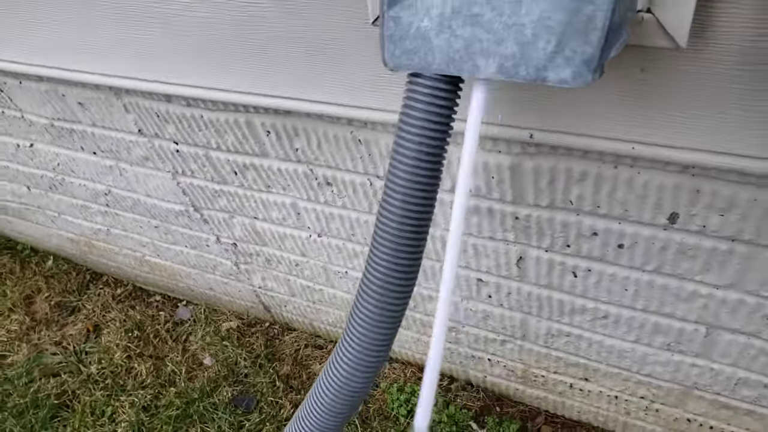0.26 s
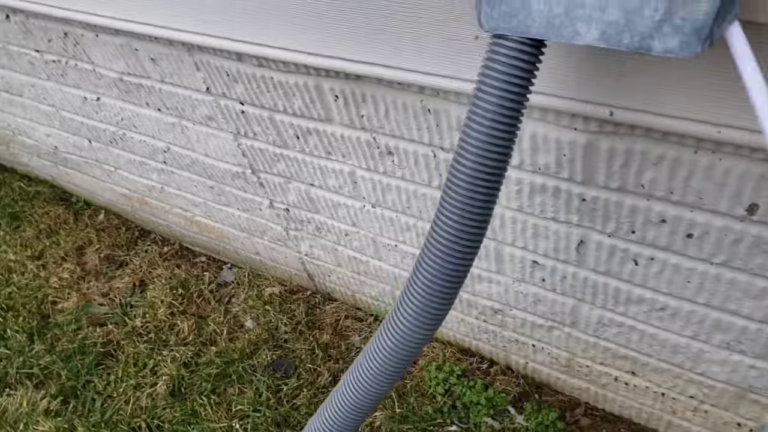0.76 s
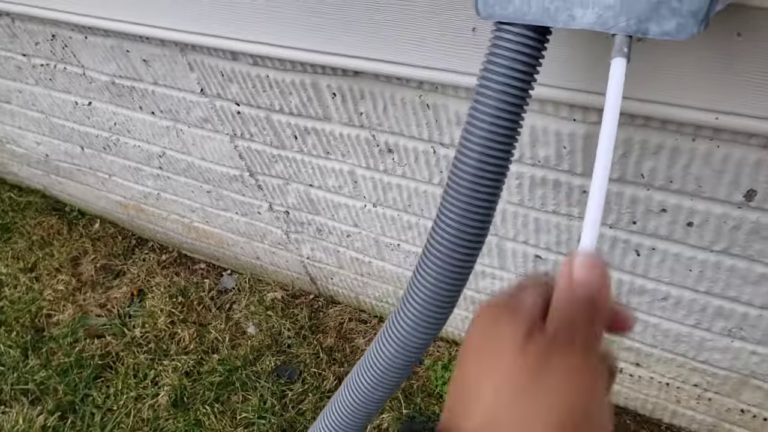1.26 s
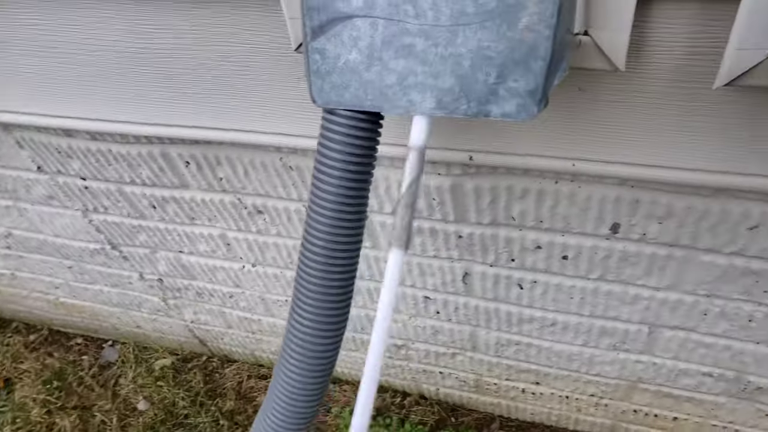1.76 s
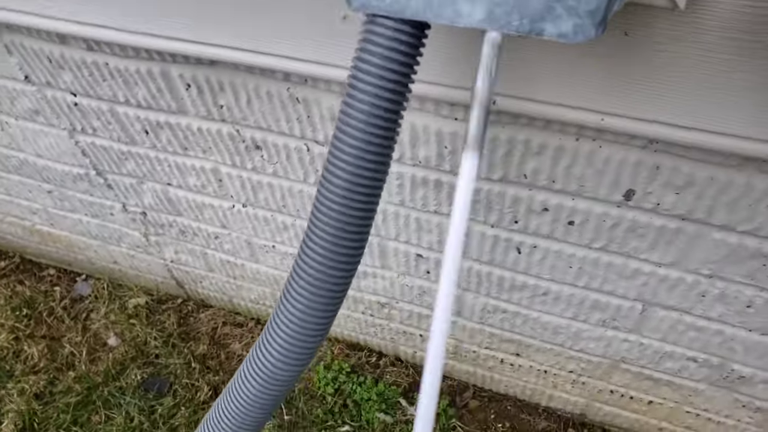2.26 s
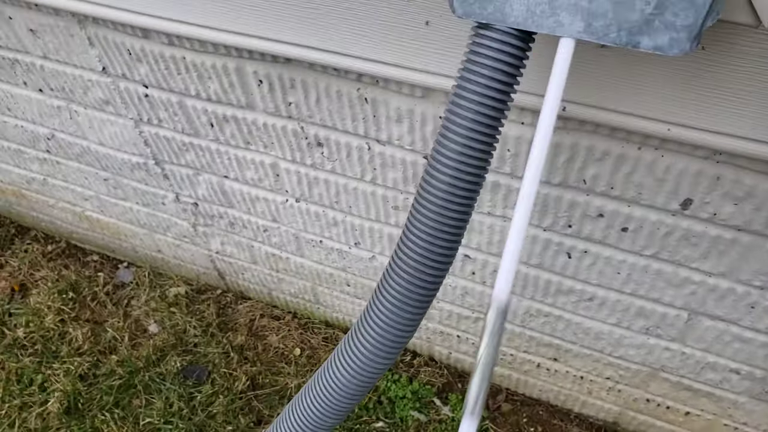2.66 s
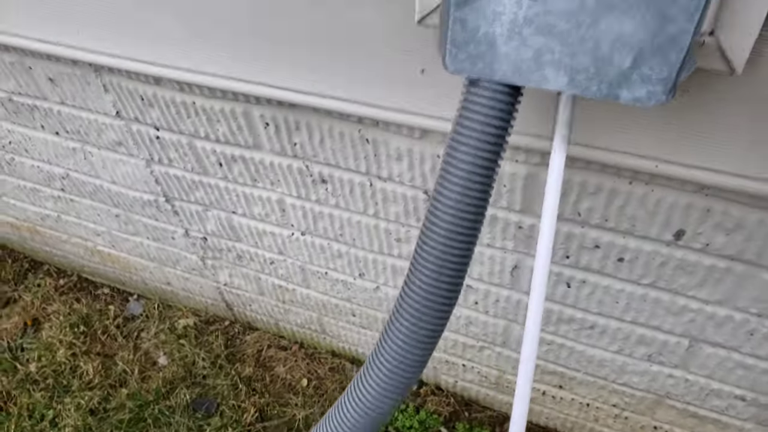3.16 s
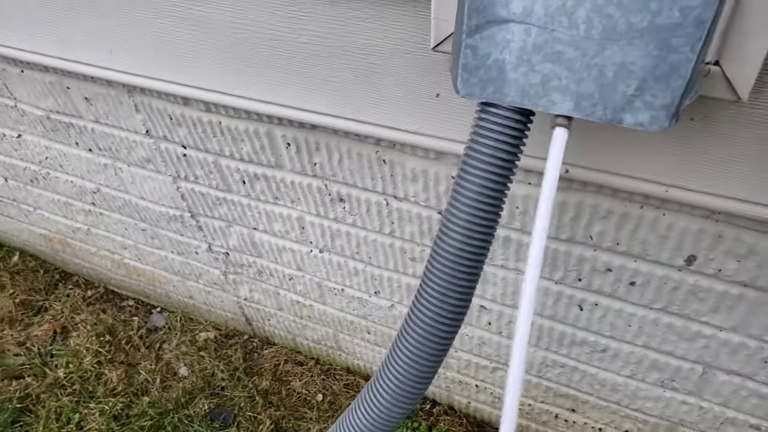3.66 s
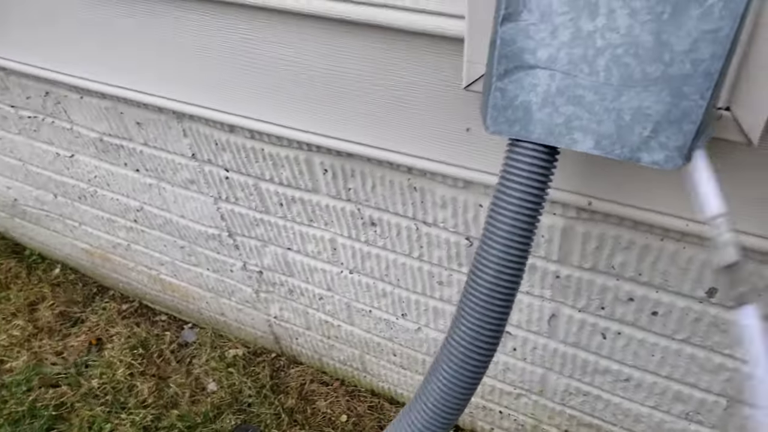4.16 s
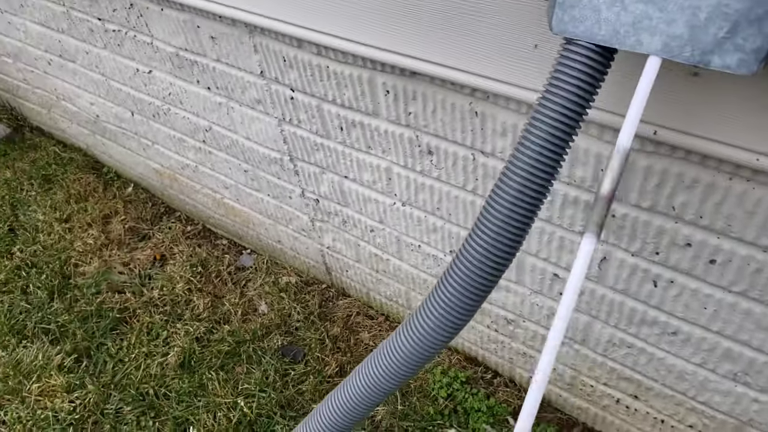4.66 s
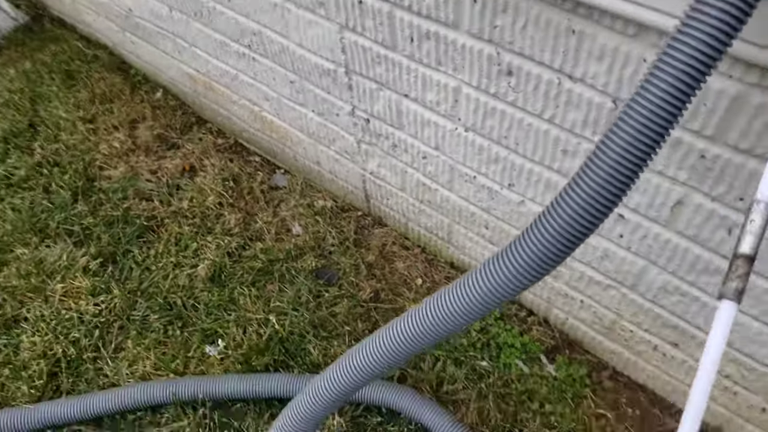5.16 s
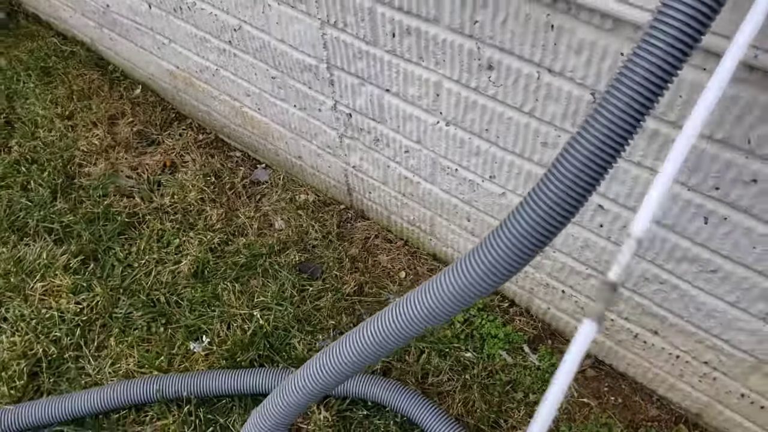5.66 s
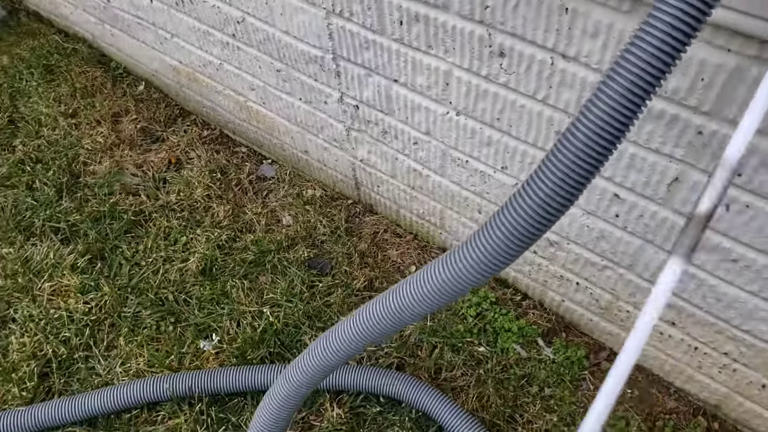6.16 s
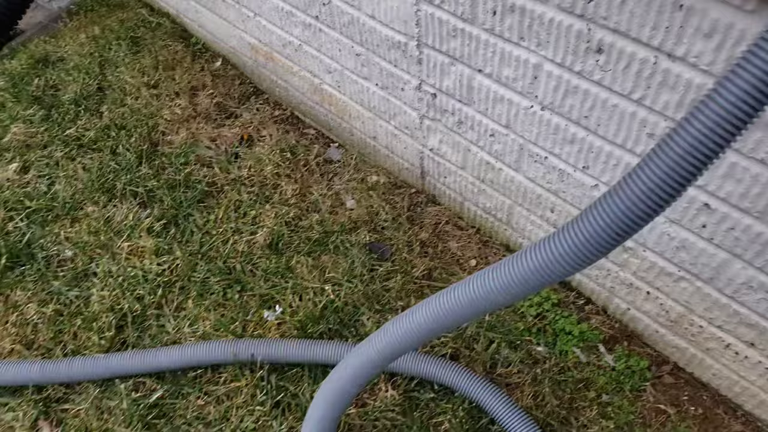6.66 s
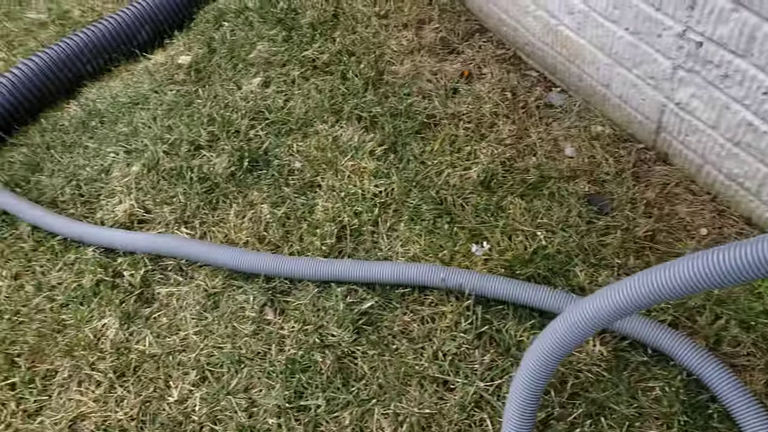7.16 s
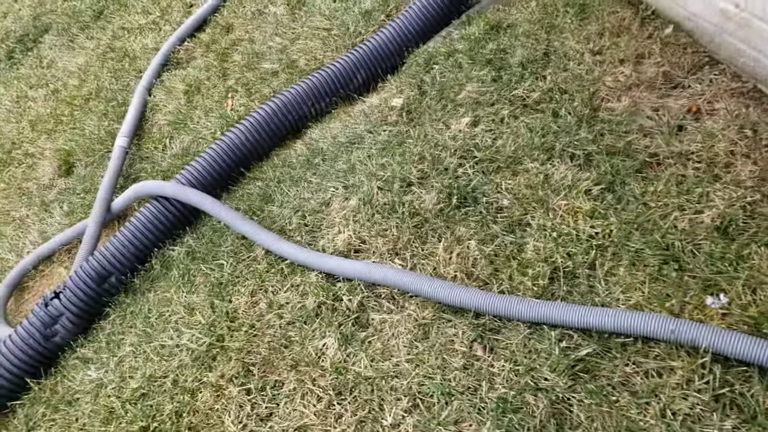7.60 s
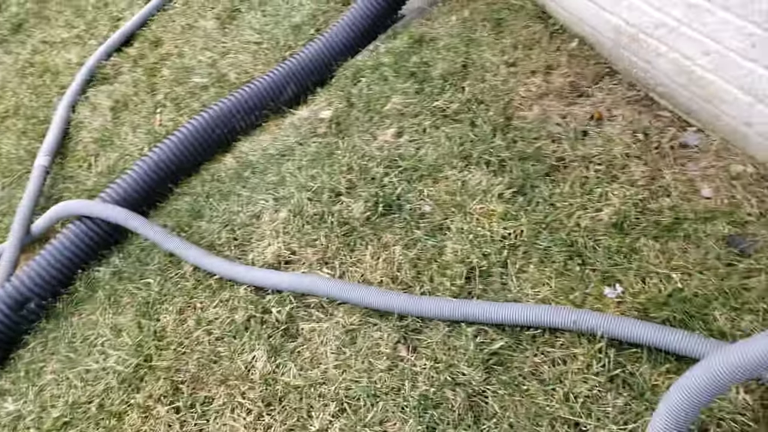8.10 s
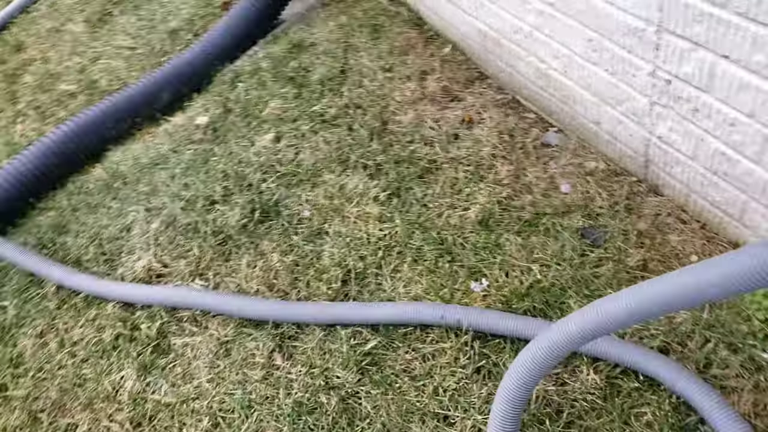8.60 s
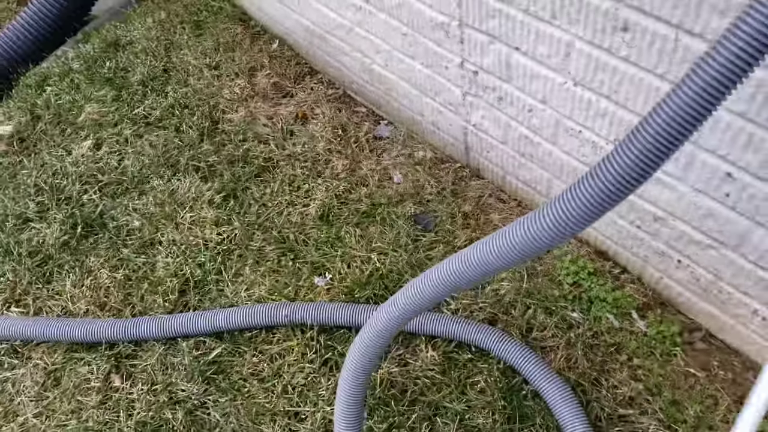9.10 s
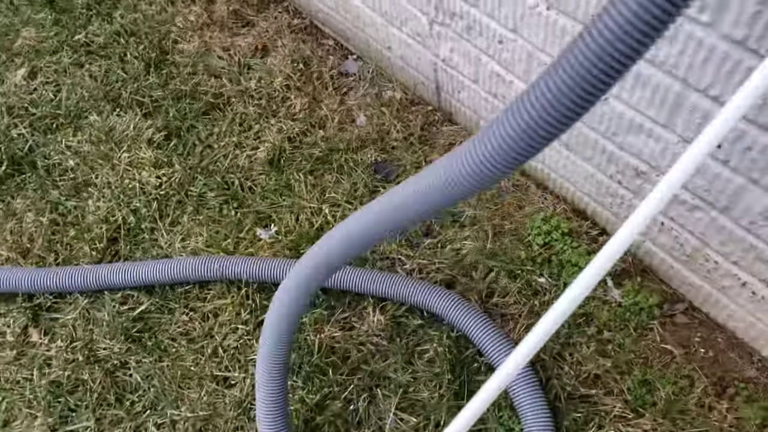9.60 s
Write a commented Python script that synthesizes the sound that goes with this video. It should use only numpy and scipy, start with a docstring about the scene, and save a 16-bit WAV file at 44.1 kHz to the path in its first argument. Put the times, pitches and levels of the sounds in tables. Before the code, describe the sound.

Irregular hollow metal bangs, plastic clacks and coupling clinks rattle over a distant engine drone, stop for about a second, then resume.

```python
"""A flexible cleaning rod knocks on a sheet-metal vacuum hood on a house wall, and rests for a moment. Each
knock is a burst of noise that rings the dryer duct, the hood, the rod and its metal couplings. Inside the duct
the rod's brush tumbles and scrapes: random small contacts shaped by a spectrum. Couplings clink on the rim, and
slips of the rod and its couplings rub and squeak through narrow, gliding resonances. The vacuum hums across the
lawn (sines in noise) and air hisses, while the listener turns away and back."""
import sys
import numpy as np
from scipy import signal
from scipy.fft import rfft, irfft, next_fast_len
from scipy.io import wavfile
from scipy.ndimage import uniform_filter1d, map_coordinates

SR = 44100
rng = np.random.default_rng(int(sys.argv[2]) if len(sys.argv) > 2 else 0)


def wav_out(sig):
    """Save sig, one row per channel (or a flat mono array), as 16-bit PCM at SR to the path in sys.argv[1]."""
    wavfile.write(sys.argv[1], SR, np.round(np.clip(np.atleast_2d(sig).T, -1, 1) * 32767).astype(np.int16))


N = 433944


def gain_of(db):
    """Turns decibels into an amplitude factor."""
    return 10 ** (np.asarray(db) / 20)


def evened(x):
    """Scales a signal to unit rms."""
    return x / np.sqrt(np.mean(x ** 2) + 1e-20)


def steadied(x, seconds):
    """Holds the power even over this stretch of time, leaving the quicker bumps."""
    power = uniform_filter1d(np.mean(x ** 2, 0), size=int(seconds * SR))
    return x / np.sqrt(np.maximum(power, 0) + power.mean() / 20)


def read(points, hz):
    """Reads a spectrum whose points are joined by straight lines over log frequency."""
    f, value = np.transpose(points)
    return np.interp(np.log(hz + 1), np.log(f + 1), value)


def curve(rows, order=1):
    """Reads one column of a time table at every sample."""
    rows = np.asarray(rows)
    return np.interp(np.arange(N) / SR, rows[:, 0], rows[:, order])


def add(mix, s, sound):
    """Mixes a stereo sound in at s seconds."""
    part = mix[:, max(round(s * SR), 0):][:, :sound.shape[1]]
    part += sound[:, :part.shape[1]]


def drift(rate_hz):
    """Wanders slowly at random, with unit rms: noise with its quick changes removed."""
    hz = np.fft.rfftfreq(N // 64, 64 / SR)
    spectrum = rfft(rng.standard_normal(N // 64)) / (1 + (hz / rate_hz) ** 4)
    slow = evened(irfft(spectrum))
    return np.interp(np.arange(N) / 64, np.arange(len(slow)), slow)


# How alike the two ears hear. Each row: frequency in Hz, likeness from 0 to 1.
SAME = [(100, 0.99), (350, 0.99), (600, 0.82), (800, 1), (1200, 0.41), (2200, 0.22), (4000, 0.15),
        (15000, 0)]


def radiate(force, spectrum, ripple=0):
    """Two force tracks ring a body and reach the ears, alike in the bass and unlike in the treble."""
    length = force.shape[-1]
    size = 2 * next_fast_len((length + 1) // 2)
    bins = size // 2 + 1
    hz = abs(np.fft.fftfreq(size, 1 / SR))
    # this phase makes the body ring only after the force arrives
    log_gain = np.log(gain_of(read(spectrum, hz) + ripple))
    body = np.exp(np.conj(signal.hilbert(log_gain)))[..., :bins]
    same = np.clip(read(SAME, hz[:bins]), 0, 1)
    mid, side = rfft(force, size) * body
    mid, side = mid * np.sqrt(1 + same), side * np.sqrt(1 - same)
    return irfft(np.array([mid + side, mid - side]), size)[..., :length]


def grains(per_s, spread_db):
    """Draws random contacts, mostly small and a few large."""
    size = gain_of(spread_db * np.minimum(rng.exponential(1, N), 4))
    happens = rng.random(N) < per_s / SR
    return evened(rng.standard_normal((2, N)) * size * happens)


SPOT_DB, SPOT_WIDTH_HZ = 5.8, 85  # resonances of a spot: depth, and width near 1 kHz


def spot(count, size, depth_db):
    """Each place that is hit favours its own resonances: a random ripple over frequency, in dB."""
    hz = abs(np.fft.fftfreq(size, 1 / SR))
    place = np.sqrt(hz * 1000) / SPOT_WIDTH_HZ
    heights = np.clip(rng.standard_normal((count, 256)), -1.7, 1.7)
    step = place.astype(int)
    blend = np.sin(np.pi / 2 * (place % 1)) ** 2
    return depth_db * (heights[:, step] * (1 - blend) + heights[:, step + 1] * blend)


BOUNCES_PER_S = 220  # how often a dragging rod bounces


def bounces(count, size):
    """Makes the uneven run of ticks, fading in about a millisecond each, with which the rod chatters."""
    at = np.cumsum(rng.uniform(.3, 1.7, (count, 64)), axis=1) * SR / BOUNCES_PER_S
    hits = np.zeros((count, size))
    np.put_along_axis(hits, np.minimum(at.astype(int), size - 1), rng.uniform(0.74, 1, at.shape), 1)
    return evened(signal.lfilter([1], [1, -np.exp(-1000 / SR)], hits))


# Tones of the engine. Each row: pitch in Hz, level in dB around which the tone wavers.
HUM = [(105.6, -41), (126.6, -46.5), (193.6, -49)]
# Colour of the drone under the tones. Each row: frequency in Hz, relative strength in dB per Hz.
DRONE = [(20, -6), (40, -8.5), (62, 2), (90, -3.5), (140, -5.5), (165, -26.5), (290, -8), (420, -18),
         (520, -13.5), (630, -55), (820, -21), (1000, -18), (1400, -20.5), (1750, -26.5), (2000, -17.5),
         (2300, -28), (3200, -31), (6000, -27)]


def vacuum():
    """The distant engine turns steadily: tones of wavering strength and phase in a low noisy drone."""
    t = np.arange(N) / SR
    tones = 0
    for hz, db in HUM:
        strength = gain_of(db + .8 * drift(rate_hz=3.9))
        tones = tones + strength * np.sin(2 * np.pi * hz * t + 0.24 * drift(rate_hz=7.4))
    drone_level = gain_of(-38.0 + drift(rate_hz=4.5))
    drone = drone_level * evened(radiate(rng.standard_normal((2, N)), DRONE))
    return np.sqrt(2) * tones + drone


# Rise and fall of the leaking air. Each row: time in seconds, relative level in dB.
AIR = [(0, -41), (1.4, -42), (2.6, -37.5), (5, -38.5), (6.4, -34), (7.5, -38.5), (8.6, -34.5), (9.3, -36.5),
       (9.84, -29.5)]
# Colour of the leaking air. Each row: frequency in Hz, relative strength in dB per Hz.
HISS = [(2500, -65), (5500, -3), (6700, -6.5), (7800, 1), (9500, -3.5), (11200, -0.5), (12700, 5),
        (15400, 7)]


def air(echo_ms=0.444, sway=0.08):
    """Leaking air is a fine hiss; its top reflects off the wall and ripples as the listener moves."""
    hiss = radiate(rng.standard_normal((2, N)), HISS)
    top = signal.sosfilt(signal.butter(4, 11000, "high", fs=SR, output="sos"), hiss)
    # the listener's swaying stretches and shortens the echo delay
    sways = drift(rate_hz=.4) + .15 * drift(rate_hz=3)
    late = np.arange(N) - SR * echo_ms / 1000 * (1 + sway * sways)
    echo = np.array([map_coordinates(ear, [late], order=3) for ear in top])
    heard = hiss + .28 * echo
    return evened(heard) * gain_of(curve(AIR) + 2.5) * gain_of([[.6], [-.6]])  # a little more at left


SETTLE_S = 0.031  # time the brush takes to settle after a knock


def jolts():
    """Shaking of the brush at every sample: it jumps with each knock and settles."""
    kicks = np.zeros(N)
    for s, force_db, *_ in KNOCKS:
        kicks[round(s * SR)] = gain_of(force_db) ** 2
    return np.sqrt(signal.lfilter([1], [1, -np.exp(-2 / (SETTLE_S * SR))], kicks))


# light taps between the knocks: how often, and how fast each rises and dies
TAPS_PER_S, TAP_RISE_S, TAP_RING_S = 85, .001, .008


def rattle():
    """The plastic rod taps lightly at random moments: short scuffs, each coloured by its own spot."""
    count = round(TAPS_PER_S * N / SR)
    t = np.arange(2048) / SR
    swell_and_fade = np.exp(-t / TAP_RING_S) * (1 - np.exp(-t / TAP_RISE_S))
    scuffs = rng.standard_normal((2, count, len(t))) * swell_and_fade
    taps = radiate(scuffs, ROD, spot(count, len(t), SPOT_DB))
    out = np.zeros((2, N))
    for k, (when, size) in enumerate(rng.random((count, 2))):
        add(out, when * N / SR, size ** 2 * evened(taps[:, k]))
    return steadied(out, 0.34)


WORKING_DB = -32  # activity of a brush at work
# level at working activity in dB, and dB gained per dB of activity
TUMBLE_DB, TUMBLE_SLOPE = -31.5, 2.23
SCRAPE_DB, SCRAPE_SLOPE = -30.5, 1.26
JOLT_THUMP_DB, JOLT_SCRAPE_DB = -15, -5  # shaking set off by a knock, relative to its force
# How busily the brush turns.
# Each row: time in seconds, tumbling activity in dB, bristle scraping activity in dB.
BRUSH = [(0.0, -51, -44), (0.16, -33.5, -37.5), (0.51, -31, -35.5), (1.0, -35, -29.5), (1.27, -33.5, -37.5),
         (1.54, -39.5, -50), (1.67, -33, -35), (2.03, -33, -33), (2.27, -31.5, -35), (2.48, -33, -38),
         (3.19, -31.5, -32), (3.75, -33, -38.5), (3.91, -33.5, -33), (4.21, -28.5, -31.5), (4.56, -29, -35),
         (4.94, -27.5, -33), (5.11, -28.5, -31.5), (5.27, -32.5, -42.5), (5.51, -36, -35.5),
         (5.73, -30.5, -32.5), (6.43, -29, -31), (6.75, -36.5, -43), (7.75, -40.5, -49), (8.16, -36.5, -34),
         (8.29, -29.5, -34.5), (8.67, -29.5, -32.5), (8.81, -26, -31.5), (8.99, -34, -41.5),
         (9.27, -33.5, -41), (9.7, -31, -34)]
# Colour of the tumbling. Each row: frequency in Hz, relative strength in dB per Hz.
TUMBLE = [(20, -32), (40, -7), (52, -15), (66, 4.5), (82, 3.5), (95, -1), (125, -8.5), (200, -1), (310, -2),
          (440, -20.5), (600, -14.5), (1200, -47)]
# Colour of the scraping. Each row: frequency in Hz, relative strength in dB per Hz.
SCRAPE = [(250, -7.5), (450, 8.5), (590, -3), (775, 10), (970, 1), (1350, -7.5), (2300, -12.5), (3000, -9),
          (5500, -16.5), (6800, -21), (7520, -14.5), (8600, -20), (15000, -30)]


def brush():
    """The brush thumps around the duct, its bristles scrape in uneven sweeps, and the rod rattles."""
    shake = jolts()
    tumble_db = TUMBLE_DB + TUMBLE_SLOPE * (curve(BRUSH, order=1) - WORKING_DB)
    scrape_db = SCRAPE_DB + SCRAPE_SLOPE * (curve(BRUSH, order=2) - WORKING_DB)
    # turning and shaking add up as powers
    tumble = np.hypot(gain_of(tumble_db), gain_of(JOLT_THUMP_DB) * shake)
    scrape = np.hypot(gain_of(scrape_db), gain_of(JOLT_SCRAPE_DB) * shake)
    sweep = drift(rate_hz=8.1)
    bumps = grains(per_s=170, spread_db=1)
    strokes = grains(per_s=1500, spread_db=1)
    thumps = steadied(radiate(bumps, TUMBLE) * gain_of(1.0 * sweep), 0.3)
    bristles = steadied(radiate(strokes, SCRAPE) * gain_of(3.2 * sweep), 0.31)
    return thumps * tumble + (bristles + gain_of(-9) * rattle()) * scrape


IMPACT_S = .0007  # how fast the first impact swells and dies: it peaks after twice this time


def struck(starts, levels_db, drags, spectrum, ticks, ripple, ring_s, tail_s, tail_db,
           chatter, impact, tilt=0):
    """One part answers every blow: a first impact, chatter while the rod drags, and a fading echo."""
    t = np.arange(ticks.shape[1]) / SR
    drags, chatter = np.maximum(drags[:, None], 1e-4), np.clip(chatter, 0, 1)
    draws = rng.standard_normal((len(starts), 2, len(t))).transpose(1, 0, 2)
    contact = np.exp(-np.maximum(t - drags, 0) / ring_s)
    contact = contact * np.sqrt(1 - chatter + chatter * ticks ** 2)
    echo = gain_of(tail_db) * np.exp(-t / tail_s)
    force = draws * ((1 - np.exp(-t / .0012)) ** 2 * (contact + echo))
    # the impact has a set strength relative to the rest of the force
    blow = draws[..., ::-1] * (t ** 2 * np.exp(-t / IMPACT_S))
    force_size = np.linalg.norm(force, axis=2, keepdims=True)
    force = force + impact * blow * force_size / np.linalg.norm(blow, axis=2, keepdims=True)
    hz = np.clip(abs(np.fft.fftfreq(len(t), 1 / SR)), spectrum[0][0], spectrum[-1][0])
    rings = radiate(force, spectrum, ripple + np.outer(tilt, np.log2(hz)))
    rings = rings * np.minimum(4 * (1 - t / t[-1]), 1)  # fades out at the end
    strength = np.sqrt(np.mean(rings[..., :SR // 50] ** 2, axis=(0, 2)))  # over the first 20 ms
    out = np.zeros((2, N))
    for k, s in enumerate(starts):
        add(out, s, rings[:, k] * gain_of(levels_db[k]) / strength[k])
    return out


BOUNCE_SHARE = 0.87  # typical strength of a bounce against the first contact
NOTE_WANDER = .06  # largest shift of a bounce's note, as a share of its pitch


def sounded(starts, levels_db, drags, pitches_hz, ring_cycles, rise_cycles):
    """A resonance rings at first contact and again, usually softer and a little off pitch, at each bounce."""
    t = np.arange(4096) / SR
    out = np.zeros((2, N))
    for s, db, drag, hz in zip(starts, levels_db, drags, pitches_hz):
        gap, size, shift = rng.uniform(-1, 1, (3, 20))
        times = np.append(0, np.cumsum(1 + gap / 2) / BOUNCES_PER_S)
        sizes = np.append(1, BOUNCE_SHARE * (1 + size / 2))
        notes_hz = hz * np.append(1, 1 + NOTE_WANDER * shift)
        # phase that sets the two ears apart
        apart = np.arccos(np.clip(read(SAME, hz), 0, 1)) * rng.choice([-1, 1]) / 2
        note = np.zeros((2, len(t)))
        for at, strength, note_hz in zip(times[times <= abs(drag)], sizes, notes_hz):
            cycles = note_hz * t[hz * t < 10 * ring_cycles]
            fade = np.exp(-cycles / ring_cycles) * (1 - np.exp(-cycles / rise_cycles))
            ring = np.sin(2 * np.pi * cycles + [[apart], [-apart]]) * fade
            add(note, at, strength * ring)
        heard_rms = np.sqrt(np.mean(note[:, t < max(drag, .02)] ** 2))
        add(out, s, note * gain_of(db) / heard_rms)
    return out


# level of each part in dB relative to the force, then dB gained per dB of hardness
BOOM_DB, CLANG_DB, CLACK_DB, TICK_DB, HOLLOW_DB = -2, -1.5, -5.5, -9.5, -1.5
BOOM_SLOPE, CLANG_SLOPE, CLACK_SLOPE, TICK_SLOPE, HOLLOW_SLOPE = -1.09, 0.064, 1, 0.96, -0.12
AWAY_DB_PER_MS = -19.5  # the hood fades as the listener turns away, per ms of delay between the ears
DUCT_TILT, ROD_TILT = 0.32, 0.094  # harder knocks are brighter: dB per octave, per dB of hardness
# the duct dulls as the brush goes deeper: dB per octave at the start, and its change per second
DUCT_TILT_START, DUCT_TILT_PER_S = 1.74, -0.18
TICK_TILT = -5  # a coupling only shaken through the rod sounds duller, in dB per octave
# The rod knocks on hood and duct. Each row: start in seconds, relative force in dB,
# hardness in dB (plus is a dry clack, minus a dull boom), time it drags in contact in seconds,
# hollow note of the spot that is hit in Hz, note of the rod in Hz.
KNOCKS = [(0.052, -35, -8.0, 0.014, 316, 2450), (0.095, -36, 7.5, 0.001, 392, 1770),
          (0.306, -29.5, 4, 0.013, 754, 3850), (0.372, -37, 5.5, 0.006, 795, 2030),
          (0.408, -28, -4.5, 0.0065, 276, 2480), (0.517, -39.5, 14.5, 0.0022, 340, 4000),
          (0.536, -23, -8, 0.0082, 275, 1900), (0.598, -31, 1, 0.0054, 442, 2510),
          (0.703, -18, 0, 0.0098, 804, 1910), (0.725, -26, 5, 0.0011, 910, 1920),
          (0.787, -27, 4, 0.024, 980, 2530), (0.832, -25.5, 5, 0.0012, 790, 2200),
          (0.857, -27.5, -6, 0.001, 830, 2330), (0.928, -19.5, -2, 0.014, 793, 2040),
          (0.947, -24, -3, 0.0024, 980, 3880), (0.997, -31, -2, 0.0054, 720, 1950),
          (1.099, -16, -2, 0.0046, 384, 2400), (1.116, -21, 4, 0.0077, 316, 2350),
          (1.138, -26, 2.5, 0.0037, 306, 1850), (1.165, -24.5, -0.5, 0.0034, 426, 3330),
          (1.227, -33.5, 5, 0.011, 505, 2430), (1.453, -26, 7, 0.0033, 417, 3730),
          (1.501, -18, 2, 0.0032, 405, 2500), (1.597, -25, 7, 0.0061, 432, 3080),
          (1.666, -41.5, 14, 0.003, 1050, 2800), (1.713, -27, -4, 0.02, 334, 2750),
          (1.802, -19, -3, 0.0013, 915, 2300), (1.883, -28.5, -7.5, 0.0071, 425, 1690),
          (1.94, -29, 2.5, 0.002, 169, 3350), (2.008, -19, 3.5, 0.024, 796, 2670),
          (2.047, -26, 2, 0.024, 930, 2050), (2.105, -26, -2, 0.004, 329, 2340),
          (2.131, -26.5, 3.5, 0.0015, 740, 2150), (2.188, -24, -1.5, 0.0015, 800, 2120),
          (2.211, -35.5, 4, 0.002, 780, 2090), (2.248, -25, -1.5, 0.0034, 770, 1220),
          (2.283, -25.5, 1.5, 0.013, 820, 1240), (2.304, -17.5, -1, 0.0071, 835, 1250),
          (2.337, -15, 0, 0.0025, 724, 2590), (2.376, -17.5, 0.5, 0.0021, 877, 2650),
          (2.426, -28.5, 3, 0.0026, 1090, 2000), (2.652, -39.5, -4, 0.0045, 725, 3100),
          (2.749, -29.5, -2, 0.006, 786, 2330), (2.834, -20, 2.5, 0.014, 856, 1427),
          (2.855, -26, 3, 0.0049, 850, 1440), (3.037, -32.5, 3, 0.0027, 320, 1460),
          (3.075, -28, -4.5, 0.0045, 312, 2520), (3.217, -13.5, 1, 0.012, 308, 2260),
          (3.234, -21.5, 3.5, 0.017, 327, 2260), (3.261, -19, 2.0, 0.003, 315, 3000),
          (3.296, -28, 0.5, 0.006, 806, 2300), (3.327, -39.5, 13, 0.004, 320, 2000),
          (3.42, -17, 0, 0.0036, 750, 3030), (3.43, -21.5, 0, 0.0037, 766, 1260),
          (3.684, -23.5, -2, 0.023, 920, 1610), (3.708, -20.5, 4.5, 0.014, 843, 1680),
          (3.727, -23.5, 1.5, 0.003, 316, 1580), (3.818, -29, 1.0, 0.0045, 324, 2720),
          (3.952, -23.5, -0.5, 0.0024, 304, 1610), (3.974, -30.5, 4, 0.001, 302, 1650),
          (4.024, -14.5, 2.5, 0.0036, 399, 2190), (4.056, -18, -4.5, 0.0011, 295, 2270),
          (4.209, -26.5, 0.5, 0.028, 262, 2170), (4.255, -21, -3.5, 0.0066, 221, 2260),
          (4.279, -22.5, 2, 0.0011, 750, 2220), (4.324, -37, -14.5, 0.018, 220, 2700),
          (4.433, -30.5, 2, 0.003, 910, 2150), (4.455, -27, -4, 0.0023, 255, 2750),
          (4.488, -27, -5, 0.008, 287, 2000), (4.603, -26.5, -1.5, 0.015, 308, 2440),
          (4.709, -20, -0.5, 0.018, 820, 3560), (4.743, -20, -6.5, 0.0049, 720, 2200),
          (4.805, -29, -5.5, 0.025, 347, 1620), (4.92, -22, 4.5, 0.02, 840, 3760),
          (4.951, -27, 1, 0.0036, 770, 3700), (4.992, -26.5, 0.5, 0.0068, 764, 2430),
          (5.038, -21, -6, 0.0019, 227, 2070), (5.108, -23, 5.5, 0.017, 770, 1690),
          (5.181, -32.5, -7, 0.0027, 196, 2400), (5.218, -28.5, -6, 0.003, 266, 1910),
          (5.51, -23.0, -0.5, 0.0032, 855, 2030), (5.634, -21, -4.5, 0.0044, 308, 1850),
          (5.66, -30, 1, 0.003, 780, 3550), (5.955, -30, -3.5, 0.018, 796, 1900),
          (5.771, -21.5, -0.5, 0.0051, 314, 2340), (6.004, -26, -6.5, 0.015, 237, 1790),
          (6.111, -23, -0.5, 0.022, 807, 2440), (6.166, -25.5, -5.5, 0.013, 169, 1380),
          (6.243, -38, 3, 0.004, 810, 2880), (6.358, -26.5, 5.5, 0.0021, 754, 1490),
          (6.406, -17, 1.0, 0.025, 802, 2870), (6.516, -25, -0.5, 0.022, 257, 2700),
          (6.593, -28.5, -0.5, 0.0059, 796, 1500), (6.772, -41.5, 12.5, 0.0022, 250, 3100),
          (8.11, -13, -1, 0.009, 285, 1895), (8.17, -21, -4.5, 0.0062, 320, 2120),
          (8.284, -24, -2, 0.0035, 256, 2280), (8.394, -17, -1.5, 0.0043, 330, 2010),
          (8.441, -24, -3.5, 0.0073, 785, 2330), (8.523, -23, 7, 0.001, 272, 2210),
          (8.625, -24.5, 2.5, 0.012, 342, 2000), (8.678, -19.5, 1.5, 0.0051, 786, 3130),
          (8.712, -27, -1.5, 0.0067, 322, 2340), (8.773, -18, -4, 0.019, 824, 3330),
          (9.357, -26, -3, 0.027, 843, 2470), (9.47, -22.5, -5, 0.024, 300, 2500),
          (9.524, -19.5, -0.5, 0.013, 730, 2350), (9.549, -26.5, -1, 0.064, 322, 2420),
          (9.714, -32.5, 6, 0.09, 466, 2420), (9.788, -23.5, 0, 0.014, 337, 3600),
          (9.805, -18, -2, 0.023, 820, 3760)]
# What each struck part sends out. Each row: frequency in Hz, relative strength in dB per Hz.
DUCT = [(60, -51.5), (130, 1.5), (200, 0.5), (250, 0), (315, 6.5), (365, -1), (440, -3), (560, -8),
        (900, -42)]
HOOD = [(400, -26), (600, -11), (700, -1.5), (775, 3.5), (890, -2), (970, 2.5), (1100, -1), (1300, -5.5),
        (2000, -32.5)]
ROD = [(900, -14.5), (1350, -1), (1520, 3), (1660, 2), (1800, 3), (2170, 3), (2470, 3), (2900, -4.5),
       (3150, -5.5), (3400, -3), (4200, -4.5), (6500, -21.5)]
COUPLING = [(3000, -29), (4600, -2), (5500, -4), (6100, -1), (6800, -8.5), (7250, -2.5), (7520, 4.5),
            (7900, -1.5), (8600, -7), (10500, -4.5), (15500, -2)]
# The rod bends in a pair of notes.
# Each row: multiple of the rod's note, level in dB relative to the force at zero hardness.
ROD_NOTES = [(1, -7.5), (1.32, -12)]


def knocks():
    """Each knock sounds duct, hood, plastic rod and coupling; hard ones favour the rod and coupling."""
    starts, force_db, hard_db, drags, hollow_hz, rod_hz = np.transpose(KNOCKS)
    away_db = AWAY_DB_PER_MS * np.interp(starts, *np.transpose(TURN))
    duct_tilt = DUCT_TILT_START + DUCT_TILT_PER_S * starts + DUCT_TILT * hard_db
    ticks = bounces(len(starts), size=8192)
    ripple = spot(*ticks.shape, SPOT_DB)
    chatter, impact = .6, .7

    boom_db = force_db + BOOM_DB + BOOM_SLOPE * hard_db
    boom = struck(starts, boom_db, drags, DUCT, ticks, ripple / 2, ring_s=0.011, tail_s=0.097,
                  tail_db=-11, chatter=0, impact=0.38, tilt=duct_tilt)
    clang_db = force_db + CLANG_DB + CLANG_SLOPE * hard_db + away_db
    clang = struck(starts, clang_db, drags, HOOD, ticks, ripple, ring_s=0.012, tail_s=0.018,
                   tail_db=-14, chatter=chatter / 2, impact=impact)
    clack_db = force_db + CLACK_DB + CLACK_SLOPE * hard_db
    clack = struck(starts, clack_db, drags, ROD, ticks, ripple, ring_s=.006, tail_s=.035,
                   tail_db=-7, chatter=chatter, impact=impact, tilt=ROD_TILT * hard_db)
    tick_db = force_db + TICK_DB + TICK_SLOPE * hard_db
    tick = struck(starts, tick_db, drags, COUPLING, ticks, ripple, ring_s=.004, tail_s=.025,
                  tail_db=-4, chatter=chatter, impact=impact, tilt=TICK_TILT)
    hollow_db = force_db + HOLLOW_DB + HOLLOW_SLOPE * hard_db
    hollow = sounded(starts, hollow_db, drags, hollow_hz, ring_cycles=5.1, rise_cycles=0.64)
    rod = 0
    for ratio, db in ROD_NOTES:
        note_db = force_db + db + .55 * hard_db
        rod = rod + sounded(starts, note_db, drags, ratio * rod_hz, ring_cycles=8, rise_cycles=9.6)
    return boom + clang + clack + tick + hollow + rod


CLINK_DB = 0.5  # how loudly the rim rings
# A metal coupling strikes the rim of the hood.
# Each row: start in seconds, relative level in dB, time it drags in contact in seconds.
CLINKS = [(0.938, -22.5, 0.007), (1.451, -20.5, 0.0023), (1.801, -21.5, 0.0012), (3, -29, 0.065),
          (3.264, -22.5, .002), (3.419, -21, .002), (4.056, -22.5, .001), (4.455, -22, 0.0027),
          (4.505, -29.5, 0.0011), (4.803, -29.5, 0.031), (6.163, -28, 0.0053), (6.405, -25, 0.01),
          (8.11, -22.5, 0.007), (8.166, -23, 0.0035), (8.677, -19, 0.00085), (9.549, -27, 0.043),
          (9.732, -23.5, 0.014), (9.778, -17.5, 0.004), (9.783, -13, 0.0037)]


def clinks():
    """A coupling that meets the rim itself rings bright and short."""
    starts, levels_db, drags = np.transpose(CLINKS)
    ticks = bounces(len(starts), size=4096)
    ripple = spot(*ticks.shape, SPOT_DB / 2)
    return struck(starts, levels_db + CLINK_DB, drags, COUPLING, ticks, ripple, ring_s=.0035,
                  tail_s=0.017, tail_db=-11.0, chatter=.5, impact=.5)


# Rubs and faint squeaks. Each row: start in seconds, length in seconds, first pitch in Hz,
# last pitch in Hz, width of each of two stacked resonances in Hz, level in dB before fading in and out.
RUBS = [(2.585, 0.069, 5100, 3070, 400, -43.5), (4.594, 0.049, 2500, 2370, 260, -34),
        (4.646, 0.033, 2400, 2430, 220, -37), (6.398, 0.026, 7800, 7380, 210, -20),
        (7.169, 0.076, 1480, 1750, 180, -34), (8.129, 0.11, 2500, 2080, 330, -40),
        (8.205, 0.102, 2390, 2170, 340, -35), (9.69, 0.16, 7400, 7300, 330, -29.5)]


def rubs():
    """Quick separate slips of the rod or of a metal coupling ring a narrow resonance, which glides as the
    pressure changes."""
    out = np.zeros((2, N))
    for s, length, start_hz, end_hz, width, db in RUBS:
        fade = signal.windows.tukey(max(round(length * SR), 64), .7)
        pole = np.exp(-np.pi * max(width, 30) / SR)
        slips = bounces(1, size=SR // 2) * rng.standard_normal((2, SR // 2))
        slips = slips[:, :len(fade)] + 0j
        slips = signal.lfilter([1], np.poly([pole, pole]), slips)
        # a turning phase lifts the resonance to the gliding pitch
        pitch_hz = np.linspace(start_hz, end_hz, len(fade))
        turn = np.exp(2j * np.pi * np.cumsum(pitch_hz) / SR)
        both_ears = slips + slips[::-1] / 2  # each ear also hears half of the other
        add(out, s, gain_of(db) * fade * evened((both_ears * turn).real))
    return out


# The listener turns. Each row: time in seconds, delay of the sound at the left ear in milliseconds.
TURN = [(0, 0.054), (4.2, 0.034), (5.2, 0.061), (6.4, 0.15), (7.2, 0.32), (8.5, 0.427), (9.2, 0.26),
        (9.84, 0.25)]


def scene():
    """All sources together, with the left ear lagging as the listener turns."""
    left, right = vacuum() + air() + brush() + knocks() + clinks() + rubs()
    late = np.arange(N) - SR * curve(TURN) / 1000
    left = map_coordinates(left, [late], order=5)
    return np.array([left * gain_of(-0.17), right * gain_of(-0.5)])


def record(dry):
    """The microphone drops the deepest bass and rounds off peaks near full scale; then the top is cut."""
    thinned = signal.sosfilt(signal.butter(3, 34, "high", fs=SR, output="sos"), dry)
    rounded = thinned / (1 + thinned ** 6) ** (1 / 6)
    low_pass = signal.firwin(511, 15600, window=("kaiser", 9), fs=SR)  # cut in Hz
    return signal.oaconvolve(rounded, low_pass[None], "same")


dry = scene()
out = record(dry)
wav_out(out)
```